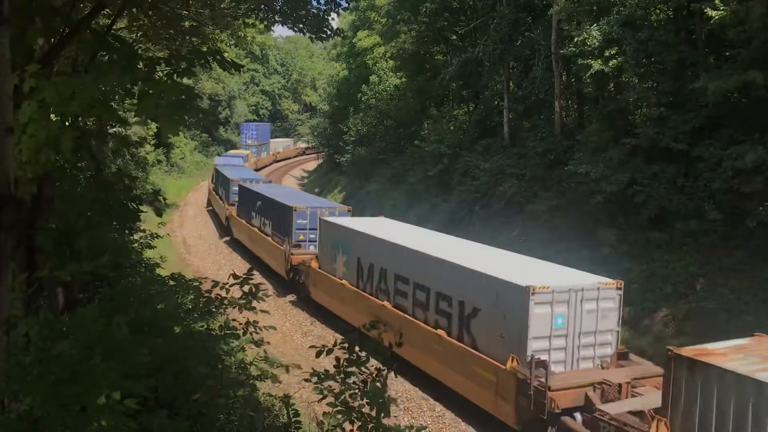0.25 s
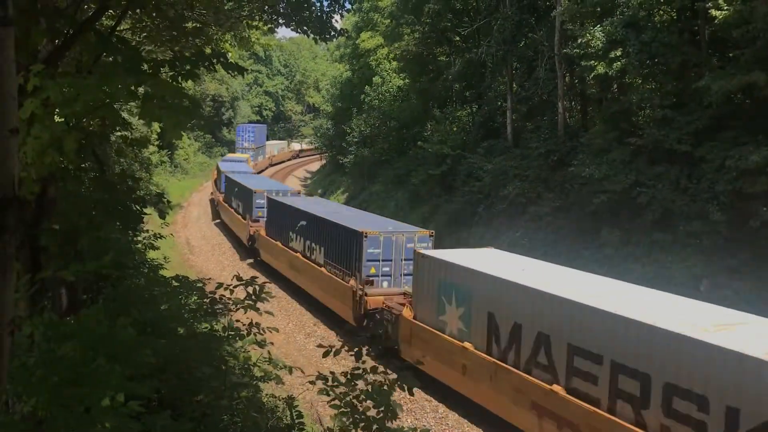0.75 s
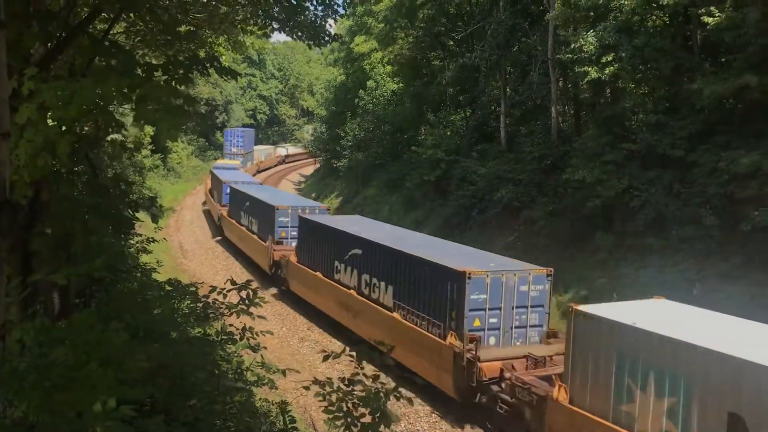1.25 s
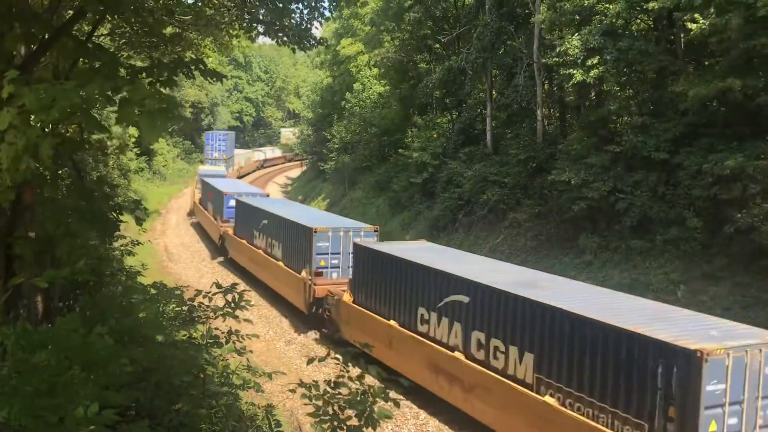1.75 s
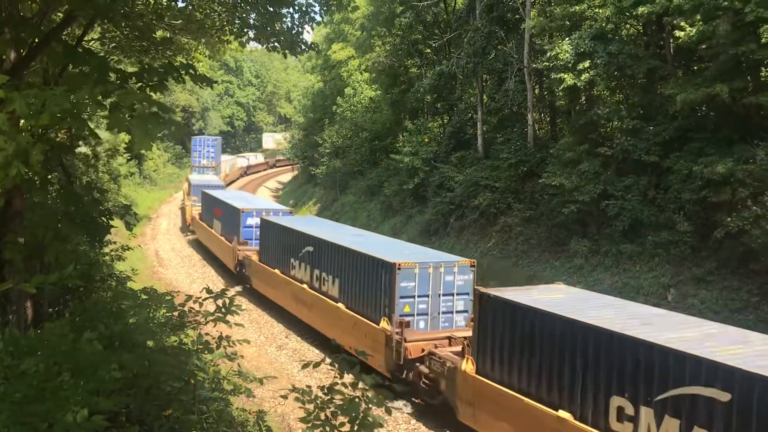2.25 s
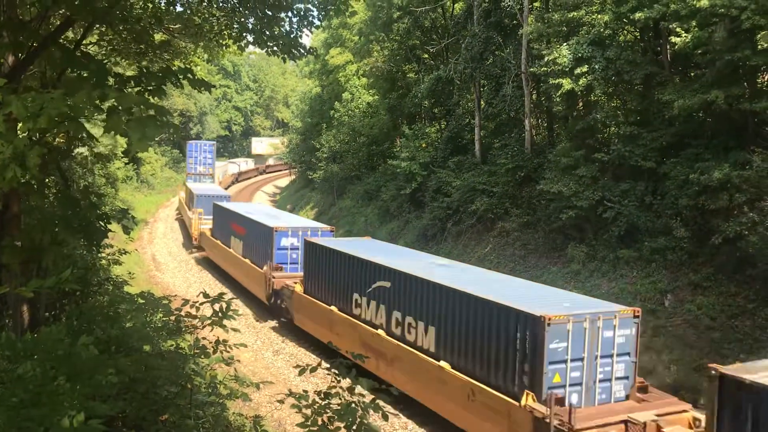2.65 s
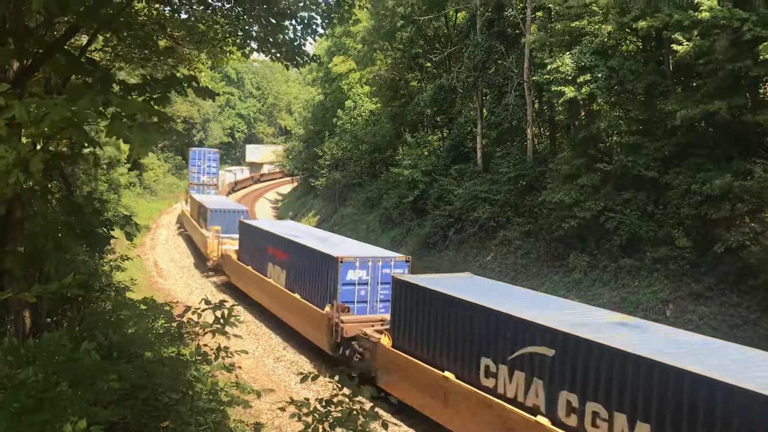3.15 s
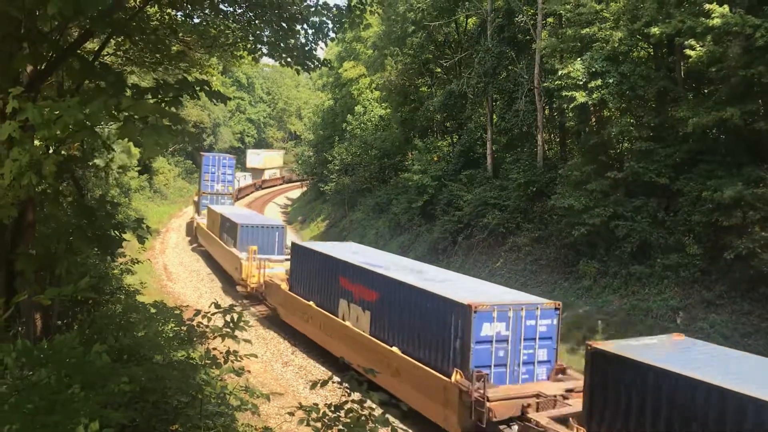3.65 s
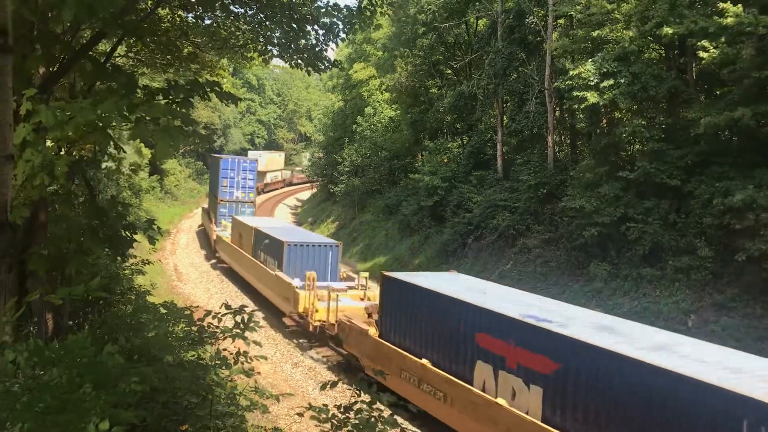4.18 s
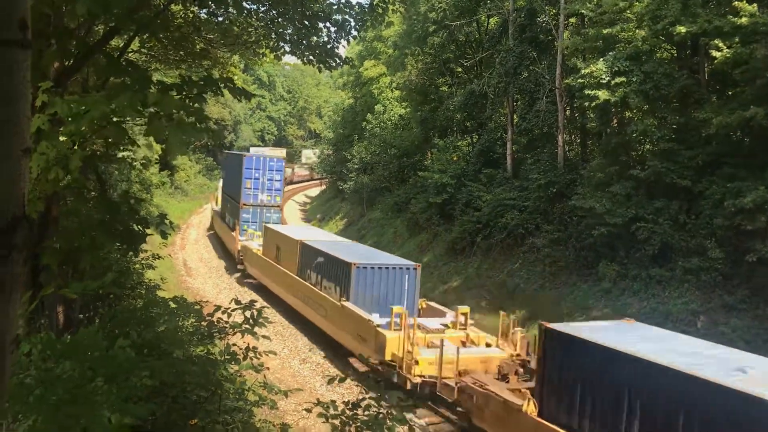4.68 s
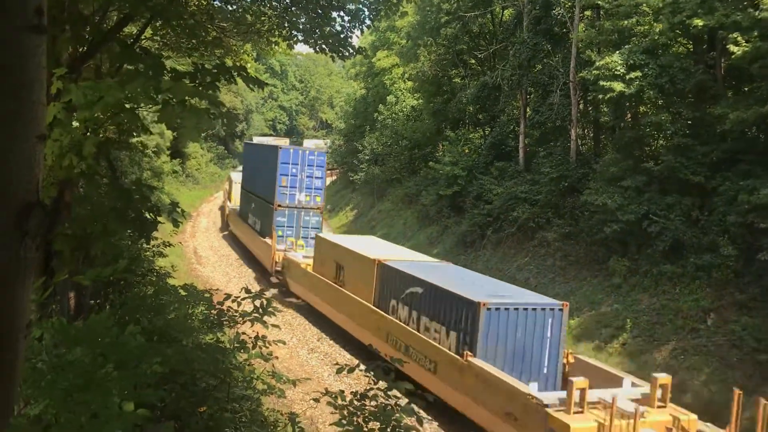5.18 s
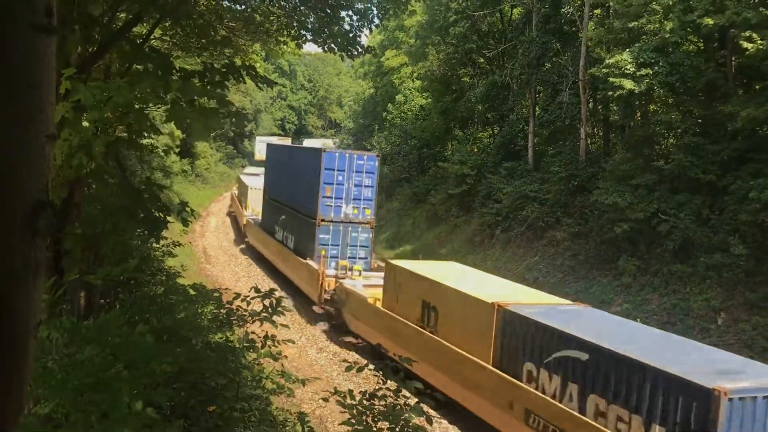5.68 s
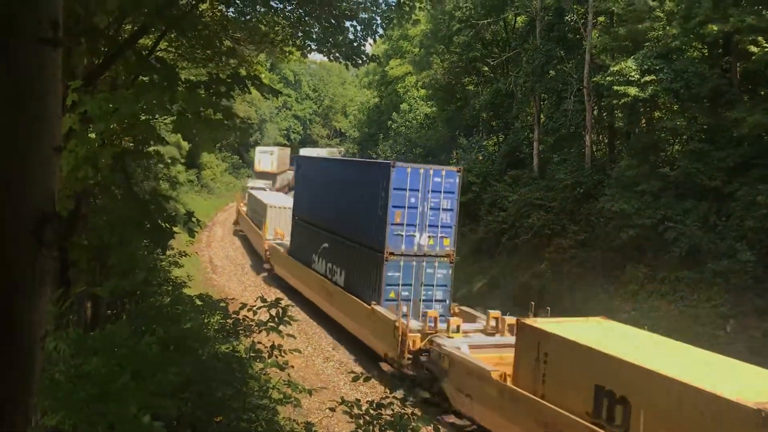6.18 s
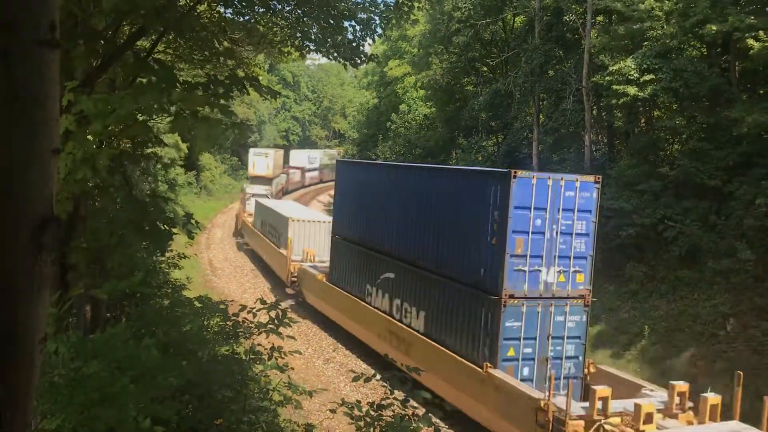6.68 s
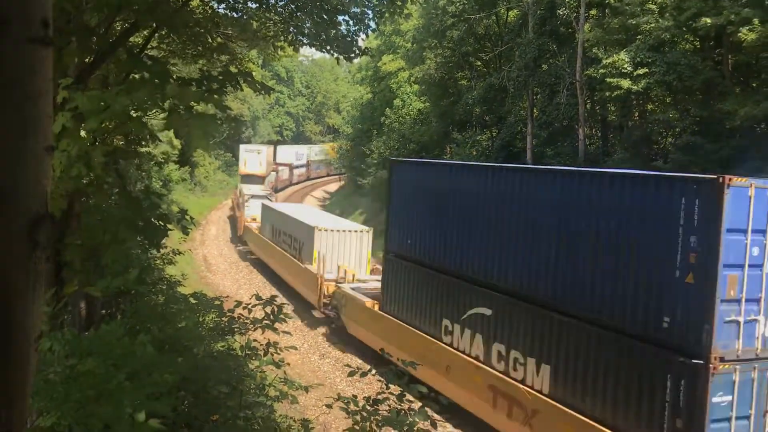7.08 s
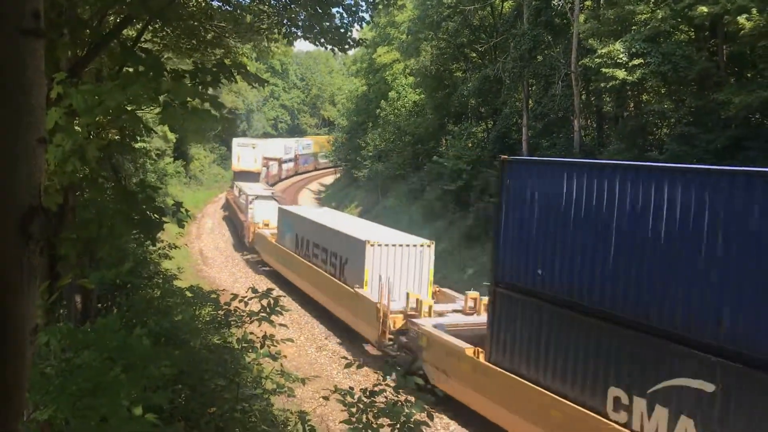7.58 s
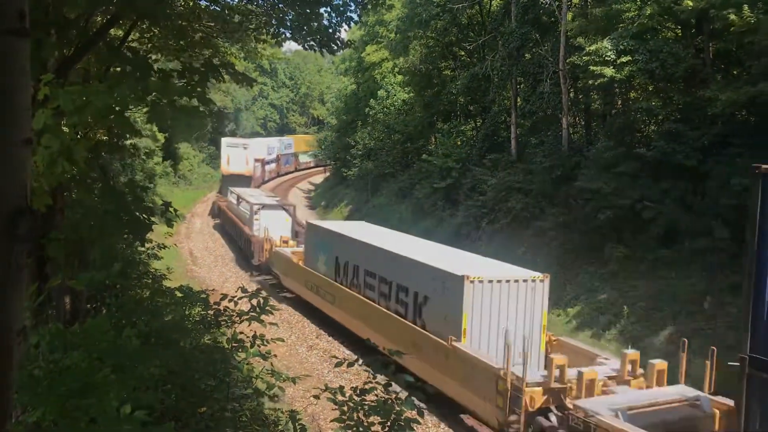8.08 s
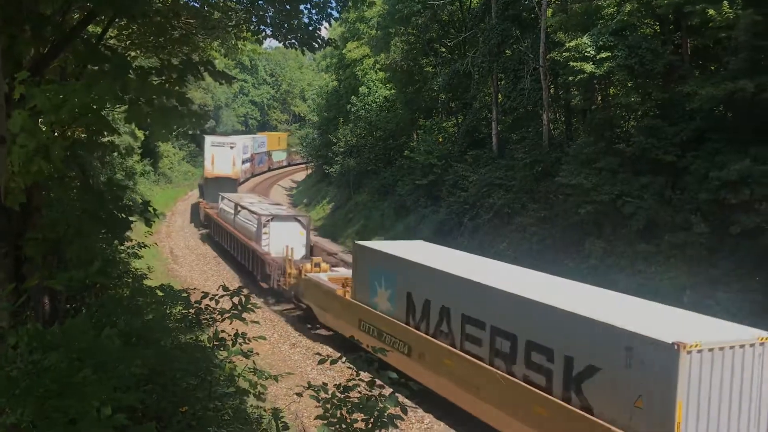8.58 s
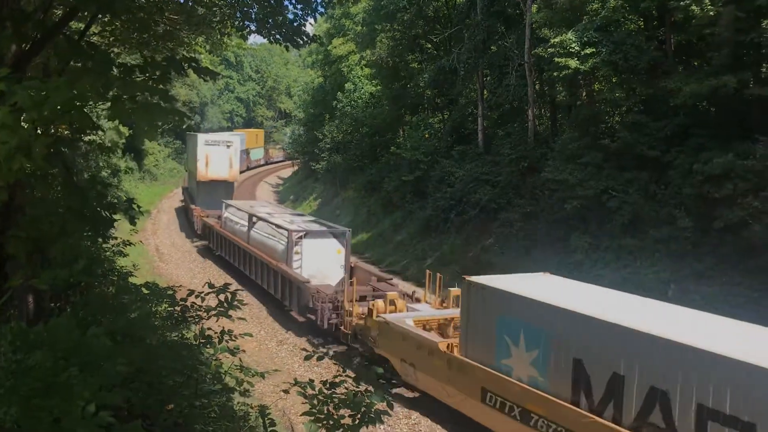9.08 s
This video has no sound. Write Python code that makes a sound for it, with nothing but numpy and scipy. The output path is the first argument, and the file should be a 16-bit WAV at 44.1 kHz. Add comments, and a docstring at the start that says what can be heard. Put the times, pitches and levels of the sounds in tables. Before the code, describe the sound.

Outdoors in a railway cutting, heard from about eleven metres: continuous low wagon rumble, hollow container thuds and bright scraping steel. Two wheels squeal, the lower one fading early, the higher one growing intensely loud and sliding down in pitch as it rolls by. Trees smear it into a shimmering echo; rumble and hiss continue to the end.

```python
"""Wagon rumble and wheel roar come first: a container train in a tight curve, in a wooded cutting.
The microphone is on the bank, 11 m from the passing wheel; flanges hiss, parts groan, couplings clank.
One stick-slip wheel squeals by, its pitch falling; trees return it at every Doppler shift between.
A second wheel squeals lower and dies away. Rolling and rubbing are coloured noise, groans and clanks
are resonances, and the squeals are sines with a slow random wobble."""
import sys
import numpy as np
from scipy import signal
from scipy.fft import rfft, irfft, next_fast_len
from scipy.io import wavfile

SR = 44100
rng = np.random.default_rng(int(sys.argv[2]) if len(sys.argv) > 2 else 0)


def materialize(psi):
    """Save the field psi as 16-bit PCM at rate SR to the path in sys.argv[1].

    A 1-D psi becomes a single channel; in a 2-D psi each row is a channel.
    """
    bounded = np.clip(np.atleast_2d(psi).T, -1, 1)
    quanta = np.round(bounded * 32767).astype(np.int16)
    wavfile.write(sys.argv[1], SR, quanta)


N = 411894
TIME = np.arange(N) / SR
SLOW_SR = 2400  # Hz, rate of the slow random curves
SLOW_TIME = np.arange(0, N / SR + 1 / SLOW_SR, 1 / SLOW_SR)
SOUND_SPEED, TRAIN_SPEED = 343, 13.74  # m/s


def from_db(db):
    """Decibels to gain."""
    return 10 ** (np.asarray(db) / 20)


def rms_one(x):
    """Scale to unit power."""
    return x / np.sqrt(np.mean(np.abs(x) ** 2) + 1e-20)


def in_time(rows):
    """Each column of a table, interpolated at every sample."""
    seconds, *columns = np.transpose(rows)
    return [np.interp(TIME, seconds, column) for column in columns]


def ramp(start_s, length_s):
    """A straight rise from 0 to 1."""
    return np.clip((TIME - start_s) / length_s, 0, 1)


def swell(moment_s, spread_s):
    """A smooth bell-shaped rise and fall around a moment."""
    return np.exp(-.5 * ((TIME - moment_s) / spread_s) ** 2)


def lifts(rows):
    """Brief swells or dips added up, in dB."""
    return sum(db * swell(moment_s, spread_s) for moment_s, spread_s, db in rows)


def flutter(cutoff_hz, order=2):
    """Complex low-passed noise at the slow rate: chance in both level and phase."""
    sos = signal.butter(order, cutoff_hz, fs=SLOW_SR, output="sos")
    white = rng.standard_normal((2, len(SLOW_TIME) + SLOW_SR))
    filtered = signal.sosfilt(sos, white[0] + 1j * white[1])
    return rms_one(filtered[SLOW_SR:])  # drop the filter's first second


def drift(cutoff_hz):
    """Slow chance of spread 1."""
    return np.interp(TIME, SLOW_TIME, rms_one(flutter(cutoff_hz).real))


def coloured(spectrum):
    """Noise of the given colour, silent outside it, rms 1."""
    hz, db = np.transpose(spectrum)
    size = next_fast_len(N)
    bins_hz = np.maximum(np.arange(size // 2 + 1) * SR / size, 1)
    gain = from_db(np.interp(np.log(bins_hz), np.log(hz), db, left=-np.inf, right=-np.inf))
    white = rng.standard_normal(size)
    return rms_one(irfft(rfft(white) * gain, size)[:N])


def resonate(x, hz, width_hz):
    """One damped resonance rung by x, rms 1."""
    radius = np.exp(-np.pi * width_hz / SR)
    feedback = [1, -2 * radius * np.cos(2 * np.pi * hz / SR), radius * radius]
    return rms_one(signal.lfilter([1, 0, -1], feedback, x))


def tone(hz, wobble):
    """A sine on a pitch curve, carrying a slow complex wobble of level and phase."""
    smooth = signal.resample_poly(wobble, SR // 300, SLOW_SR // 300)[:N]
    cycles = np.cumsum(hz + np.zeros(N)) / SR
    return np.sqrt(2) * (smooth * np.exp(2j * np.pi * cycles)).real


# weight of the passing wagons before trims:
# (time [s], container boom [dB], wagon rumble [dB], wheel roar [dB], rail noise [dB])
ROLLING_LEVELS = [(0, -33, -23.5, -24, -29.0), (0.7, -26, -23.5, -25.0, -30), (1.1, -28, -23.5, -25.0, -32),
                  (1.8, -28, -26.5, -25.0, -30.0), (2.2, -32.0, -26, -26.0, -30.5),
                  (3.0, -30, -23.5, -24.5, -30), (3.55, -35, -29.0, -27, -32.5),
                  (3.8, -28, -28.0, -24, -29), (4.2, -38, -27.0, -24.5, -31.5),
                  (5.4, -43, -31, -25.5, -31.5), (6.0, -44, -28, -27, -33),
                  (6.9, -39.0, -24.5, -27.5, -33.5), (7.6, -37.0, -24.5, -29.5, -33),
                  (8.5, -35, -25.0, -26.5, -32), (9.34, -38, -24, -25, -30)]
# wagon lurches: (time [s], spread [s], change of boom [dB], change of rumble [dB])
LURCHES = [(0.137, .05, 8, 5.5), (.79, .05, 3, 3), (1.01, .03, 1, 1), (1.933, 0.072, -2, 5.5),
           (2.185, .03, 7, 3), (2.93, .07, 5, -0.5), (4.067, .04, 16, -1), (4.59, .06, 11, 0),
           (5.13, .05, 10, 3), (7.21, 0.029, -3, 3)]
# colours of boom, rumble, roar and rail noise: (frequency [Hz], relative density [dB])
BOOM_COLOUR = [(20, -35), (26, -22), (32, -13), (40, -4), (50, -1), (58, -3), (72, -18)]
RUMBLE_COLOUR = [(48, -18), (60, 3.5), (71, -2), (88, -0.5), (110, -1.5), (135, -8.5), (180, -13.5),
                 (280, -39)]
ROAR_COLOUR = [(110, -11), (170, -5), (220, 0.5), (290, 1), (380, -2.5), (470, -6.5), (600, -7), (740, -12),
               (950, -28), (1400, -40)]
RAIL_COLOUR = [(500, -11), (700, -6), (850, 2.5), (1100, 0.5), (1300, -1.5), (1420, -3), (1570, 0.5),
               (1790, -2.5), (1950, -1), (2250, -4), (2450, -3.5), (3100, -4), (4000, -7), (5000, -11)]
# an out-of-round wheel throbs once a turn, fading in over the turn before THROB_S
THROB_S, TURN_S, THROB_DB = 7.9, .228, 4


def rolling(boom_trim_db=-2, jolt_db=1.0):
    """Rough wheels on rough rail shake the containers, the wagons, the wheels and the rails."""
    boom, rumble, roar, rail = in_time(ROLLING_LEVELS)
    turns = (TIME - THROB_S) / TURN_S
    throb = THROB_DB * ramp(THROB_S - TURN_S, TURN_S) * np.cos(2 * np.pi * turns)
    boom = boom + throb + lifts((s, spread, db) for s, spread, db, _ in LURCHES)
    rumble = rumble + lifts((s, spread, db) for s, spread, _, db in LURCHES)
    jolts = jolt_db * drift(11.4)  # roar and rail noise vary together
    return (from_db(boom + boom_trim_db) * coloured(BOOM_COLOUR)
            + from_db(rumble) * coloured(RUMBLE_COLOUR)
            + from_db(roar + jolts) * coloured(ROAR_COLOUR)
            + from_db(rail + jolts) * coloured(RAIL_COLOUR))


# wagon parts that groan or sing for a moment, and at 8.64 s a brief flare of wheel-mode ringing: # (time [s],
# spread [s], frequency [Hz], width of the sharper resonance [Hz], level [dB])
GROANS = [(2.65, .2, 390, 27, -30), (3.24, .16, 353, 32, -26.5), (3.8, .17, 362, 32, -26.5),
          (2.52, 0.1, 1965, 49, -36), (2.95, .25, 1965, 40, -44), (4.57, .12, 370, 70, -31),
          (2.3, 0.11, 2350, 90, -40), (7.35, .13, 1043, 60, -41), (.08, .25, 4600, 250, -39.5),
          (.25, 0.42, 607, 120, -33), (5.37, 0.27, 604, 110, -39.5), (5.7, 0.55, 306, 60, -31),
          (7.86, 0.86, 264, 50, -34.5), (8.33, .1, 12400, 900, -34), (8.64, .08, 6110, 70, -39)]


def groans():
    """Loaded parts rub, and once a wheel mode rings out: noise through two resonances at one frequency,
    swelling and fading."""
    total = 0
    for moment_s, spread_s, hz, width_hz, db in GROANS:
        sharp = resonate(rng.standard_normal(N), hz, width_hz)
        voice = resonate(sharp, hz, 2 * width_hz)
        total = total + from_db(db) * swell(moment_s, spread_s) * voice
    return total


# couplings take up slack: (time [s], level before the rise and decay [dB])
CLANKS = [(1.425, -26), (1.78, -33), (2.19, -32), (2.97, -32)]
# coupling resonances: (frequency [Hz], width [Hz], relative level [dB])
COUPLING_MODES = [(1030, 120, 2), (1250, 160, 3), (1550, 150, 0), (1750, 93, -4)]


def clanks(t60_s=0.74, rise_s=0.0074):
    """A coupling knocks; the wood smears the blow into a short burst of noise in its resonances."""
    blows = 0
    for moment_s, db in CLANKS:
        age = np.maximum(TIME - moment_s, 0)
        blows = blows + from_db(db - 60 * age / t60_s) * (1 - np.exp(-age / rise_s))
    ringing = sum(from_db(db) * resonate(rng.standard_normal(N), hz, width_hz)
                  for hz, width_hz, db in COUPLING_MODES)
    return blows * rms_one(ringing)


def strands(modes):
    """Wheel modes sing roughly; each catches and lets go by itself, its pitch wandering a little."""
    flicker_db, wander = 3.4, .013  # wander is a share of the pitch
    total = 0
    for hz, width_hz, db in modes:
        level_db = db + flicker_db * drift(3.9)
        pitch = hz * (1 + wander * drift(1.5))
        total = total + from_db(level_db) * tone(pitch, flutter(width_hz / 2))
    return rms_one(total)


# flanges rubbing the rail, before trims: (time [s], hiss [dB], sizzle [dB])
RUBBING_LEVELS = [(0, -34.5, -40), (0.6, -34.0, -35), (1.05, -33.5, -35), (1.8, -30.5, -29.5),
                  (2.3, -30.5, -32), (3.1, -35.5, -38.5), (3.6, -37.0, -40.5), (4.9, -37, -37.5),
                  (5.5, -36.5, -34.5), (6.3, -35.5, -37), (7.05, -30.5, -31.5), (7.7, -32.5, -35.0),
                  (8.1, -33.5, -34), (8.55, -30, -31.5), (9.34, -33, -35.5)]
# colours of hiss and sizzle: (frequency [Hz], relative density [dB])
HISS_COLOUR = [(3000, -6), (4000, -0.5), (4600, -3), (4900, -6), (5250, 0.5), (5850, -0.5), (6500, -1),
               (7100, -3.5), (8000, -6.5), (10000, -17)]
SIZZLE_COLOUR = [(6000, -20), (7800, -4), (8800, -0.5), (9700, -1), (10100, -2), (10450, -4.5),
                 (11000, 0.5), (12400, 0.5), (13100, -3.5), (13700, -2.5), (15700, -5.5), (17000, -14)]
# modes of the nearing, then of the receding wheels: (frequency [Hz], width [Hz], relative level [dB])
NEARING_MODES = [(4560, 150, 1.5), (5860, 140, 3), (6700, 140, 3), (7300, 160, -0.5), (8520, 440, 3.5),
                 (9600, 90, -6), (11550, 250, -8.5), (12100, 200, -6), (13000, 150, -8)]
RECEDING_MODES = [(5130, 60, -0.5), (6070, 120, 0.5), (7010, 130, -0.5), (7930, 140, -3), (8880, 83, 2),
                  (9900, 140, -5.5), (12280, 200, -8), (12720, 150, -13), (15500, 90, -10)]
# power share of the rubbing that rings in the modes at a hard sizzle;
# its growth, passed through from_db, makes the share follow the sizzle's power
RING_SHARE, HARD_SIZZLE_DB, RING_GROWTH = 0.24, -31.5, 2


def flanges(hiss_trim_db=-2, ring_trim_db=-1.5, grip_db=.5, turn_s=6.3):
    """Sliding steel hisses with uneven grip; pressed harder, more of the power rings in wheel modes."""
    hiss, sizzle = in_time(RUBBING_LEVELS)
    share = np.clip(RING_SHARE * from_db(RING_GROWTH * (sizzle - HARD_SIZZLE_DB)), 0, .9)
    sliding = (from_db(hiss + hiss_trim_db) * coloured(HISS_COLOUR)
               + from_db(sizzle) * coloured(SIZZLE_COLOUR))
    # first the nearing bogies are heard, then the receding ones
    passed = .5 + .5 * np.tanh(TIME - turn_s)
    modes = np.sqrt(1 - passed) * strands(NEARING_MODES) + np.sqrt(passed) * strands(RECEDING_MODES)
    ringing = from_db(ring_trim_db) * np.hypot(from_db(hiss), from_db(sizzle)) * modes
    rubbing = np.sqrt(1 - share) * sliding + np.sqrt(share) * ringing
    return rubbing * from_db(grip_db * drift(12))


def passing(rest_hz, pass_s, distance_m):
    """Doppler-shifted pitch and range of a wheel rolling by."""
    along = TRAIN_SPEED * (TIME - pass_s)
    range_m = np.hypot(along, distance_m)
    approach = TRAIN_SPEED / SOUND_SPEED * along / range_m
    return rest_hz / (1 + approach), range_m


WOOD_START_M, WOOD_LENGTH_M = -110, 170  # along the track, microphone at 0


def wood(rest_hz, pass_s, rough, rough_hz, lift_hz, depth_m, falloff, sideways, shield_m, count=130):
    """Trees each return the wheel's tone with the delay, so the Doppler shift, of their own path."""
    # stick-slip is never quite even, and its roughness leans above the tone
    slip = 1 + rough * flutter(rough_hz, order=3) * np.exp(2j * np.pi * lift_hz * SLOW_TIME)
    leaves = flutter(12.7)  # the many branches of a crown make its echo fade in and out
    wheel = TRAIN_SPEED * (SLOW_TIME - pass_s)
    along = WOOD_START_M + WOOD_LENGTH_M * (np.arange(count) + rng.random(count)) / count
    across = depth_m * (1 + rng.random(count))
    offsets = rng.integers(len(leaves), size=count)
    total, power = 0, 0
    for x, y, offset in zip(along, across, offsets):
        out, back = np.hypot(wheel - x, y), np.hypot(x, y)
        delay = (out + back) / SOUND_SPEED
        # a wheel disc radiates along its axle
        gain = (y / out) ** sideways / (out * back ** falloff)
        # the bank hides the trees further down the line
        gain = gain / (1 + np.exp(x / shield_m))
        sent = np.interp(SLOW_TIME - delay, SLOW_TIME, slip, left=1)
        path_phase = np.exp(-2j * np.pi * rest_hz * delay)
        total = total + gain * np.roll(leaves, offset) * sent * path_phase
        power = power + gain ** 2
    return rms_one(total / np.sqrt(power))


# how close the squealing wheels come to the microphone
DISTANCE_M = 11.26
# flares of the second wheel: (time [s], spread [s], lift [dB])
LOW_FLARES = [(2.74, .04, 4), (3.52, 0.095, 3.5), (4.79, .03, 14.5)]
# its pitch at rest and the moment it would pass
LOW_HZ, LOW_PASS_S = 2743, 6.6
# it builds up until the start, holds, then dies away from the end
LOW_START_S, LOW_END_S = 2.92, 3.6
LOW_ECHO_DB, LOW_ECHO_RISE_DB_PER_S, LOW_ECHO_FALL_DB_PER_S = -34, 22, 7
LOW_DIRECT_DB, LOW_DIRECT_FALL_DB_PER_S = -33, 12


def low_squeal():
    """A wheel further back sings in a lower mode and dies away before it arrives; its echo lingers."""
    hz, _ = passing(LOW_HZ, LOW_PASS_S, DISTANCE_M)
    building_db = LOW_ECHO_RISE_DB_PER_S * np.minimum(TIME - LOW_START_S, 0)
    dying_s = np.maximum(TIME - LOW_END_S, 0)
    # the straight sound builds twice as steeply as the echo
    direct_db = LOW_DIRECT_DB + 2 * building_db - LOW_DIRECT_FALL_DB_PER_S * dying_s + lifts(LOW_FLARES)
    echo_db = LOW_ECHO_DB + building_db - LOW_ECHO_FALL_DB_PER_S * dying_s
    scatter = wood(LOW_HZ, LOW_PASS_S, rough=.4, rough_hz=90, lift_hz=13, depth_m=9,
                   falloff=0.92, sideways=.1, shield_m=21, count=60)
    straight = tone(hz, 1 + 0.16 * flutter(13))
    return from_db(direct_db) * straight + from_db(echo_db) * tone(LOW_HZ, scatter)


# the squeal thrown back by the wood: (time [s], level [dB])
ECHO_LEVEL = [(0, -35.5), (1.05, -29.5), (1.45, -32.5), (2.05, -28.5), (2.3, -32), (2.9, -23.0), (3.5, -22),
              (3.87, -24.5), (4.2, -20.0), (4.8, -13.5), (5.6, -16.0), (5.95, -15), (6.45, -15.5),
              (7.0, -21.5), (7.8, -21), (9.34, -26)]
# the straight sound flares up or ducks behind the foliage: (time [s], spread [s], change [dB])
FLARES = [(2.87, .05, 6), (3.95, .06, -5), (4.27, 0.045, 5.5), (4.72, 0.023, 10), (5.34, 0.015, 7.5),
          (5.44, 0.045, -6), (5.62, 0.05, 6), (5.81, 0.043, 11.5), (6.23, 0.022, 11), (6.82, 0.093, -11),
          (6.98, 0.019, 13.5), (7.28, .09, -16), (7.49, 0.029, 11.5), (8.45, 0.16, 7.5), (9.0, 0.067, 12)]
# the squealing wheel: its pitch at rest and the moment it passes
SQUEAL_HZ, PASS_S = 3656, 5.67
# straight sound: level abreast, loss per tenfold distance, spread of the fading through the foliage
ABREAST_DB, SPREADING_DB, FADING_DB = -14, 35, 2
# bushes screen the wheel until it comes into the open
CLEAR_S, CLEARING_S, SCREEN_DB = 2.68, 1, -14.5


def main_squeal(octave_db=-32, octave_echo_db=-26):
    """Stick-slip locks one wheel mode into a near sine with a faint octave; it grows as it nears."""
    hz, range_m = passing(SQUEAL_HZ, PASS_S, DISTANCE_M)
    screened = .5 - .5 * np.tanh((TIME - CLEAR_S) / (2 * CLEARING_S))
    distance_db = -SPREADING_DB * np.log10(range_m / DISTANCE_M)
    foliage_db = SCREEN_DB * screened + lifts(FLARES) + FADING_DB * drift(8.1)
    direct_db = ABREAST_DB + distance_db + foliage_db
    echo_db = in_time(ECHO_LEVEL)[0]
    straight = tone(hz, 1 + .15 * flutter(28)) + from_db(octave_db) * tone(2 * hz, flutter(40))
    scatter = wood(SQUEAL_HZ, PASS_S, rough=0.42, rough_hz=193, lift_hz=64.94, depth_m=8,
                   falloff=0.95, sideways=1.0, shield_m=21.7)
    scatter_octave = wood(2 * SQUEAL_HZ, PASS_S, rough=0.62, rough_hz=190, lift_hz=30.2, depth_m=13,
                          falloff=.5, sideways=1.2, shield_m=20, count=70)
    echo_octave = from_db(octave_echo_db) * tone(2 * SQUEAL_HZ, scatter_octave)
    thrown_back = tone(SQUEAL_HZ, scatter) + echo_octave
    return from_db(direct_db) * straight + from_db(echo_db) * thrown_back


# the whole sound dips for about a second as the wheel passes
DIP_S, RECOVER_S, DIP_RAMP_S, DIP_DB = 5.593, 6.557, 0.27, -6


def scene():
    """The whole train at one microphone on the bank; the level dips briefly as the wheel passes."""
    train = rolling() + groans() + clanks() + flanges() + low_squeal() + main_squeal()
    dip_db = DIP_DB * (ramp(DIP_S, DIP_RAMP_S) - ramp(RECOVER_S, DIP_RAMP_S))
    return (from_db(dip_db) * train)[None]


CUTOFF_HZ = 15750


def record(dry):
    """The highest peaks are rounded and the top is cut steeply."""
    rounded = dry / (1 + np.abs(dry) ** 6) ** (1 / 6)
    top_cut = signal.ellip(12, .1, 90, CUTOFF_HZ, fs=SR, output="sos")
    return signal.sosfilt(top_cut, rounded)


dry = scene()
out = record(dry)
materialize(out)
```